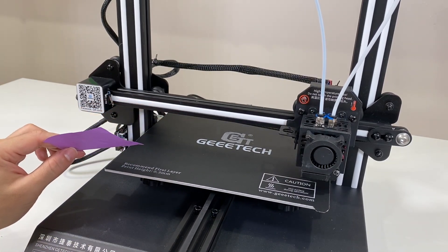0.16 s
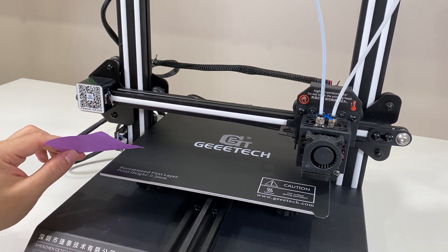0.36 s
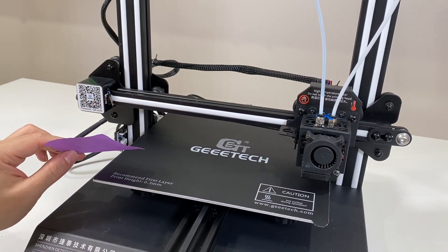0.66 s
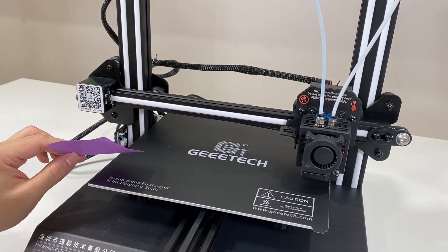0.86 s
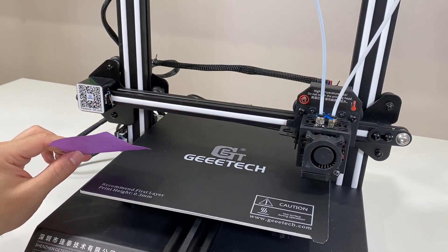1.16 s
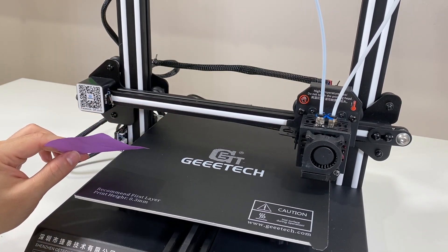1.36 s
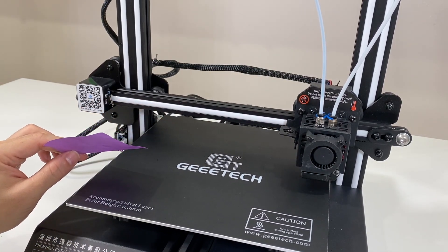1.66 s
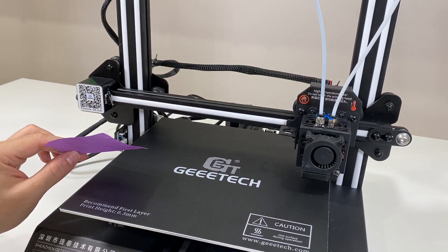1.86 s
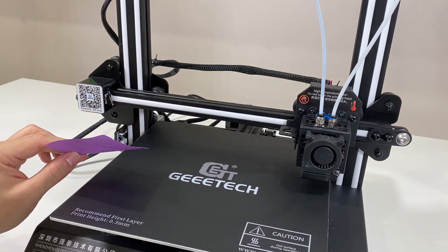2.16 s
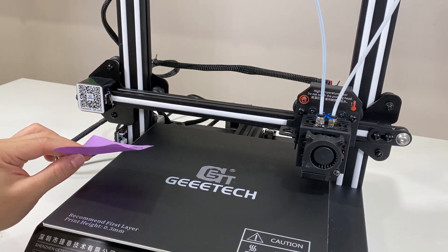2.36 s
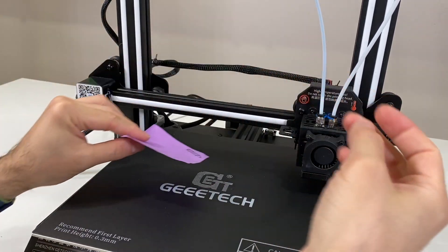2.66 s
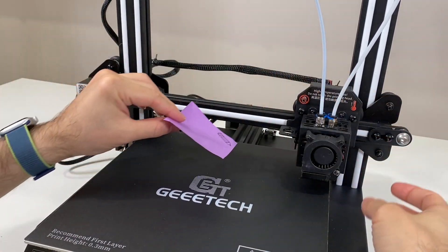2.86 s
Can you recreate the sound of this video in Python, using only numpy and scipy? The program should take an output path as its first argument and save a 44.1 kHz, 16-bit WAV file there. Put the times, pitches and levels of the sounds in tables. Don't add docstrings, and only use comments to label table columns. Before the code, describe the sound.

Steady low electric motor hum and faint whine as a printer bed slides, fans hissing quietly

```python
import sys
import numpy as np
from scipy import signal
from scipy.io import wavfile
from scipy.ndimage import uniform_filter1d

SR = 44100
rng = np.random.default_rng(int(sys.argv[2]) if len(sys.argv) > 2 else 0)


def voltage_ratio(decibels):
    exponent = np.asarray(decibels, float) / 20
    return 10 ** exponent


def transcribe(u):
    v = np.clip(np.atleast_2d(u).T, -1, 1)
    q = np.round(v * 32767).astype(np.int16)
    wavfile.write(sys.argv[1], SR, q)


N = 132300


def evened(x):
    return x / np.sqrt(np.mean(abs(x) ** 2) + 1e-20)


def read(points, hz):
    f, value = np.transpose(points)
    return np.interp(np.log(hz + 1), np.log(f + 1), value)


def along(table, t):
    s, *columns = np.transpose(table)
    tracks = []
    for column in columns:
        if column.max() < -20:
            tracks.append(20 * np.log10(np.interp(t, s, voltage_ratio(column))))
        else:
            tracks.append(np.interp(t, s, column))
    return tracks


def drift(per_s, channels=2):
    hz = np.fft.fftfreq(N // 50 + 1, 50 / SR)
    shape = (channels, len(hz))
    z = rng.standard_normal(shape) + 1j * rng.standard_normal(shape)
    slow = evened(np.fft.ifft(z * np.exp(-(hz / per_s) ** 2)))
    return np.repeat(slow, 50, axis=1)[:, :N]


def tone(hz, left_db, right_db, lead, shake):
    turn = np.exp(2j * np.pi * (hz * np.arange(N) / SR + rng.random()))
    left = voltage_ratio(left_db) * np.exp(1j * lead) * np.ones(N)
    right = voltage_ratio(right_db) * np.ones(N)
    return np.sqrt(2) * (np.array([left, right]) * (1 + shake) * turn).real


def noise(gain, same, lead, tilt_db):
    a, b, c, d = rng.standard_normal(gain.shape[::-1] + (4,)).T
    right = a + 1j * b
    left = (same * right + np.sqrt(1 - same ** 2) * (c + 1j * d)) * np.exp(1j * lead)
    z = gain * np.array([left * voltage_ratio(tilt_db / 2), right * voltage_ratio(-tilt_db / 2)])
    return evened(signal.istft(z, nperseg=1024, noverlap=768)[1][:, :N])


def motor():
    # (time [s], 4th left [dB], 12th left [dB], 12th right [dB],
    # 12th left lead [rad], 20th left [dB])
    hum_path = [(0.0, -35.1, -50.3, -54.6, 1.6, -66.2), (0.3, -32.0, -48.6, -54.4, 1.9, -66.6),
                (0.5, -30.0, -45.9, -52.6, 1.8, -66.6), (0.75, -28.5, -45.7, -52.3, 1.6, -61.3),
                (1.2, -26.8, -52.1, -53.4, 1.9, -58.2), (1.42, -25.9, -56.6, -53.9, 1.9, -57.7),
                (1.6, -25.4, -54.9, -47.9, 1.3, -58.4), (1.8, -24.8, -51.2, -46.6, 0.8, -60.6),
                (2.09, -25.2, -52.8, -48.0, 0.7, -60.8), (2.25, -25.5, -50.8, -47.1, 0.6, -64.3),
                (2.5, -25.1, -47.1, -46.4, 0.8, -64.3), (2.7, -25.4, -44.6, -46.4, 1.2, -64.5),
                (3.0, -25.5, -45.9, -48.7, 1.4, -62.5)]
    # (time [s], 8th left [dB], 8th right [dB], 8th left lead [rad],
    # 16th left [dB], 16th right [dB], 16th left lead [rad], 56th right [dB], 56th left lead [rad],
    # 20th right [dB])
    frame_path = [(0.05, -57.6, -55.8, 0.5, -56.2, -57.7, 0.6, -69.5, -0.1, -67.3),
                  (0.3, -60.2, -54.5, 0.9, -56.4, -56.3, 0.5, -72.8, -0.3, -72.2),
                  (0.6, -67.6, -65.4, 3.0, -57.5, -56.0, 0.0, -72.0, -0.3, -72.1),
                  (0.9, -87.2, -64.3, 4.7, -59.3, -57.0, -0.1, -70.1, -0.2, -76.5),
                  (1.2, -60.7, -61.0, 7.8, -56.7, -56.9, -0.1, -68.4, -0.2, -64.3),
                  (1.5, -59.2, -77.4, 8.4, -55.9, -56.3, -0.3, -73.5, -0.9, -61.0),
                  (1.8, -60.5, -60.4, 7.9, -57.5, -57.6, -0.5, -74.8, -1.1, -58.4),
                  (2.1, -58.3, -57.9, 7.6, -55.3, -56.9, -0.4, -91.6, -2.4, -59.4),
                  (2.4, -55.9, -55.9, 7.3, -58.8, -59.5, -0.3, -77.3, -4.3, -62.1),
                  (2.7, -51.3, -52.4, 7.3, -65.6, -61.4, -0.1, -70.5, -5.5, -64.0),
                  (2.95, -51.1, -54.3, 7.1, -73.3, -62.9, -0.8, -70.7, -5.5, -62.3)]
    # (time [s], left [dB], right [dB], left lead [rad],
    # octave left [dB], octave right [dB], 56th left [dB])
    whine_path = [(0.0, -57.1, -56.5, -0.3, -74.9, -72.8, -68.1),
                  (0.3, -53.1, -59.7, -0.6, -63.9, -64.5, -72.4),
                  (0.6, -52.3, -62.2, -0.6, -69.6, -74.2, -67.1),
                  (1.1, -54.9, -56.9, -0.6, -60.7, -63.3, -65.6),
                  (1.5, -56.6, -57.4, -0.6, -61.9, -68.8, -70.3),
                  (1.82, -63.9, -57.6, -0.0, -68.9, -76.3, -66.9),
                  (1.885, -66.6, -62.3, -2.7, -76.6, -75.3, -67.7),
                  (1.95, -58.8, -60.9, -0.6, -73.9, -70.4, -66.9),
                  (2.07, -62.0, -61.3, -1.0, -67.6, -68.6, -64.1),
                  (2.15, -70.1, -64.1, -2.2, -65.1, -63.5, -62.7),
                  (2.37, -63.9, -60.3, -3.4, -68.4, -65.6, -64.2),
                  (2.46, -58.8, -57.6, -5.4, -62.3, -75.1, -65.8),
                  (2.53, -59.4, -54.9, -5.5, -59.0, -68.2, -65.7),
                  (2.575, -71.6, -62.6, -3.7, -57.6, -64.2, -64.6),
                  (2.65, -59.6, -58.9, -2.9, -59.3, -63.6, -63.2),
                  (2.8, -64.3, -58.8, -3.6, -61.1, -65.4, -60.2),
                  (2.855, -65.5, -62.0, -4.5, -61.8, -64.0, -60.2),
                  (2.885, -59.5, -58.0, -4.95, -62.2, -62.8, -60.3),
                  (2.95, -57.5, -57.0, -5.05, -62.2, -62.8, -60.3)]
    # (multiple of tooth rate [1], left with bed back [dB], midway [dB], forward [dB],
    # right minus left [dB], left lead [rad])
    weak_orders = [(2, -51.3, -54.6, -52.0, -1.1, -0.1), (5, -58.7, -62.2, -56.8, -5.2, 0.0),
                   (6, -56.8, -54.9, -59.8, -0.3, -0.2), (7, -61.4, -61.8, -61.2, -2.5, 0.3),
                   (24, -63.0, -63.7, -62.5, -4.4, -0.7), (30, -79.7, -72.7, -73.7, 2.9, -0.1),
                   (44, -80.0, -74.3, -69.3, -2.6, 0.8), (52, -75.6, -71.1, -69.6, -2.9, 1.0),
                   (60, -63.8, -63.0, -64.5, -8.9, 2.5), (68, -59.2, -60.3, -68.5, -15.0, 0.6),
                   (124, -80.3, -75.6, -80.8, -1.6, -2.2), (132, -73.0, -75.3, -77.3, -0.4, -3.1)]
    faint_orders = [(13, -62.1, -70.5, -71.4, -4.5, -1.1), (28, -80.2, -84.4, -66.9, -2.5, -1.8),
                    (32, -75.1, -74.2, -80.1, -4.1, 0.1), (40, -74.9, -75.6, -71.7, -11.7, -0.0),
                    (48, -82.2, -74.9, -72.7, -9.2, 0.9), (76, -85.6, -77.8, -72.5, -8.1, 0.5),
                    (80, -84.7, -83.9, -73.9, -12.6, 0.7), (120, -88.4, -85.6, -81.1, -3.2, -1.6),
                    (126, -80.2, -82.3, -83.4, -0.8, -1.7), (127, -83.5, -82.2, -85.7, -1.0, -2.6),
                    (129, -81.2, -84.6, -81.7, -1.8, -2.1), (188, -96.4, -100.3, -94.5, 0.0, -3.1),
                    (191, -96.3, -95.8, -92.6, -0.0, -3.1), (192, -88.4, -87.2, -94.6, 0.0, 3.1),
                    (193, -92.6, -98.2, -83.6, -0.0, 3.1), (194, -94.1, -90.7, -92.6, 0.0, 3.1),
                    (195, -97.5, -95.5, -95.3, 0.0, 3.1), (246, -92.5, -101.6, -88.1, 0.1, -3.1)]
    # (time [s], ..)
    travel_s = (.4, 1.55, 2.6)
    tooth_hz = 62.5
    t = np.arange(N) / SR
    hum, left12, right12, lead12, left20 = along(hum_path, t)
    left8, right8, lead8, left16, right16, lead16, right56, lead56, right20 = along(frame_path, t)
    left64, right64, lead64, left128, right128, left56 = along(whine_path, t)

    jolt_s, jolt_width_s, jolt_depth, jolt_hz = 1.995, 0.035, 0.14, 7.2
    u = np.maximum(t - jolt_s, 0)
    swing = np.exp(-u / jolt_width_s + 1j * (2 * np.pi * jolt_hz * u + 2.1))
    jolt = jolt_depth * np.e * u / jolt_width_s * swing
    roughness = np.where(u > 0, 1.65, 1)
    shake = 0.019 * roughness * drift(100, channels=1) + jolt

    hum_right = hum - 4.1 - 0.45 * np.minimum(t, 2)
    out = tone(4 * tooth_hz, hum, hum_right, 0.3, shake)
    out += tone(8 * tooth_hz, left8, right8, lead8, 0)
    out += tone(16 * tooth_hz, left16, right16, lead16, 0)
    out += tone(12 * tooth_hz, left12, right12, lead12, 0)
    out += tone(20 * tooth_hz, left20, right20, 0.45, 0)
    out += tone(56 * tooth_hz, left56, right56, lead56, 0)
    out += tone(64 * tooth_hz, left64, right64, lead64, 0)
    out += tone(128 * tooth_hz, left128, right128, -2.3, 0)
    for k, *levels_db, right_db, ahead in weak_orders + faint_orders:
        left_db = np.interp(t, travel_s, levels_db)
        wander = 0.12 if round(k) < 20 else 0.18
        out += tone(round(k) * tooth_hz, left_db, left_db + right_db, ahead, wander * drift(3.0))
    return out


def fans():
    # (frequency [Hz], level per Hz [dB])
    air_low = [(25, -28.5), (45, -3), (100, -1), (170, -6), (290, -1), (600, 2.5), (900, -1), (1300, -5.5)]
    air_high = [(1300, -7), (2200, -10.5), (4000, -14), (6000, -17.5), (7400, -21), (8500, -16.5)]
    # (frequency [Hz], level over top_db [dB])
    air_top = [(10000, 0), (12150, -1), (12550, -13), (12900, -21), (13250, -11), (13800, -7.5),
               (15350, -3), (15720, -5), (15800, -40)]
    # (frequency [Hz], width [Hz], level [dB])
    body_tones = [(50.9, 8.7, -65), (66, 6.7, -71.5), (280.3, 12, -62), (602, 25, -65), (912.5, 22, -64.5),
                  (1126, 6.8, -85), (1084, 17, -78)]
    # (frequency [Hz], likeness [0-1])
    air_same = [(40, 0.92), (170, 0.94), (340, 0.94), (560, 0.22), (1600, 0.59), (3100, 0.26), (6000, 0.54),
                (7900, 0.97)]
    # (frequency [Hz], left minus right [dB])
    air_tilt = [(100, 0.5), (340, -1.5), (600, 1.6), (2200, 1), (5800, 5.5), (6800, -2), (9000, -0.1)]
    # (frequency [Hz], left lead [half turns])
    port_lead = [(6300, 0), (7700, .64), (8560, 1), (10060, 2), (12080, 3), (13750, 4), (15750, 5)]
    fan_db, top_db, patch_db, swell_db = -49, -25.5, 1.0, 0.43
    frames = N // 256 + 5
    hz = np.fft.rfftfreq(1024, 1 / SR)[:, None]
    over_time = uniform_filter1d(rng.standard_normal((frames, len(hz))), 10, 0)
    patches = evened(uniform_filter1d(over_time, 10, 1)).T
    swell = evened(uniform_filter1d(rng.standard_normal(frames), 30))
    spectrum = air_low + air_high[1:] + [(f, db + top_db) for f, db in air_top]
    gain = voltage_ratio(read(spectrum, hz) + patch_db * patches + swell_db * swell)
    lead = np.pi * np.interp(hz, *np.transpose(port_lead))
    likeness = np.clip(read(air_same, hz), 0, 1)
    out = voltage_ratio(fan_db) * noise(gain, likeness, lead, read(air_tilt, hz))
    for centre_hz, width_hz, db in body_tones:
        fuzz = drift(width_hz / 2, channels=1) - 1
        out += tone(centre_hz, db - 0.5, db + 2, 0, fuzz)
    return out


def rollers():
    # (time [s], frequency [Hz], ring [s], level [dB], left minus right [dB])
    knocks = [(0.34, 65, 0.022, -45, .5), (.89, 100, 0.013, -50, 3), (1.021, 95, 0.017, -43.5, 1),
              (1.085, 60, 0.015, -48, -2), (1.059, 430, 0.012, -45, -9), (2.246, 159, .012, -54.5, 4),
              (2.709, 138, 0.017, -50, 2), (.232, 3300, .003, -62, 14), (0.25, 3370, .003, -65, 12),
              (2.121, 2810, 0.004, -58, -1), (2.122, 1815, .009, -52, -1), (2.096, 1498, 0.0068, -48, 2),
              (2.128, 1555, 0.0076, -52, 1), (2.129, 1304, 0.0075, -52, 1), (2.813, 9200, 0.0004, -57, 2),
              (2.813, 13500, .0004, -66, .5)]
    t = np.arange(N) / SR
    out = np.zeros((2, N))
    for s, hz, ring, db, pan_db in knocks:
        u = np.maximum(t - s, 0)
        level = voltage_ratio(db + np.array([[pan_db / 2], [-pan_db / 2]]))
        swell = np.e * u / ring * np.exp(-u / ring)
        out += level * swell * np.sin(2 * np.pi * hz * u)
    return out


def cable():
    # (start [s], rise [s], hold [s], fall [s], level [dB])
    strokes = [
        (1.003, 0.057, 0.029, 0.14, -44),
        (2.075, 0.014, 0.035, .03, -56),
    ]
    # (frequency [Hz], level [dB])
    brush_colour = [(300, -5.5), (1200, 2), (2100, -5.5), (2650, 0), (3500, -7.5), (5700, -12.5),
                    (9500, -44)]
    dulls_db_per_s, pivot_hz, grain_db = 30, 2000, 1.5
    frames = N // 256 + 5
    hz = np.fft.rfftfreq(1024, 1 / SR)[:, None]
    t = np.arange(N) / SR
    now = np.arange(frames) * 256 / SR
    since = sum(np.clip(now - s - rise, 0, .3) * (now < s + .6) for s, rise, *_ in strokes)
    dull_db = dulls_db_per_s * since * np.log2(np.maximum(hz / pivot_hz, 1))
    brush = noise(voltage_ratio(read(brush_colour, hz) - dull_db), 0.3, 0, 4.5)
    grain = evened(uniform_filter1d(rng.standard_normal(N), 120))
    brush *= voltage_ratio(grain_db * grain)
    shape = np.zeros(N)
    for s, rise, hold, fall, db in strokes:
        onset = np.clip((t - s) / rise, 0, 1)
        decay = np.exp(-np.maximum(t - s - rise - hold, 0) / fall)
        shape += voltage_ratio(db) * onset * decay
    return brush * shape


def scene():
    return motor() + fans() + rollers() + cable()


def top_cut(x):
    return signal.sosfilt(signal.butter(12, 15760, fs=SR, output="sos"), x)


def record(dry):
    bass_cut = signal.butter(3, 45, "high", fs=SR, output="sos")
    mix = signal.sosfilt(bass_cut, dry)
    return top_cut(mix)


dry = scene()
out = record(dry)
transcribe(out)
```